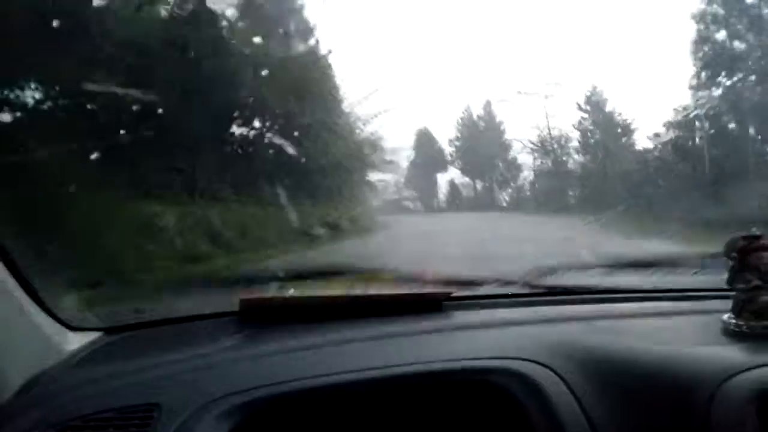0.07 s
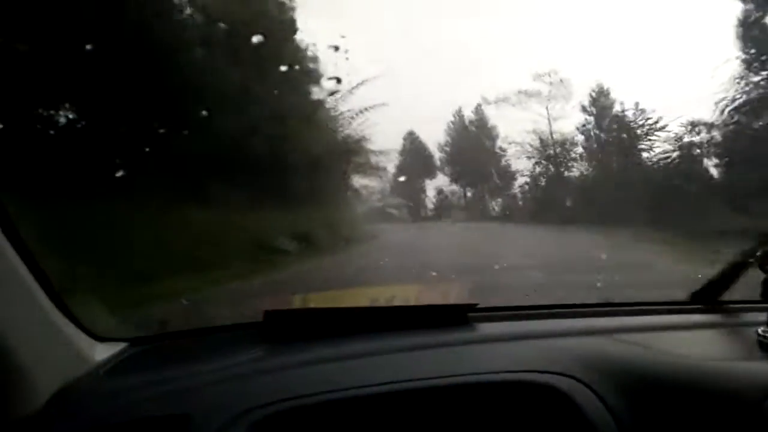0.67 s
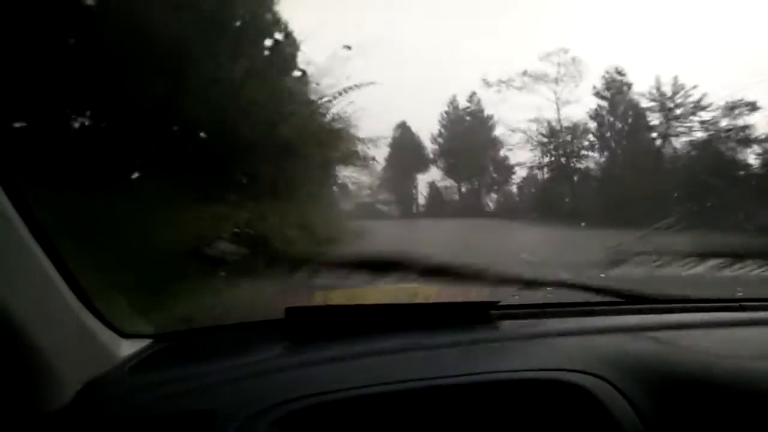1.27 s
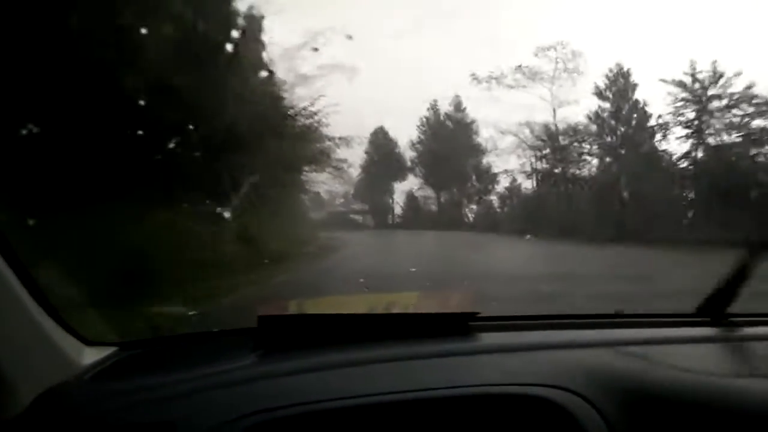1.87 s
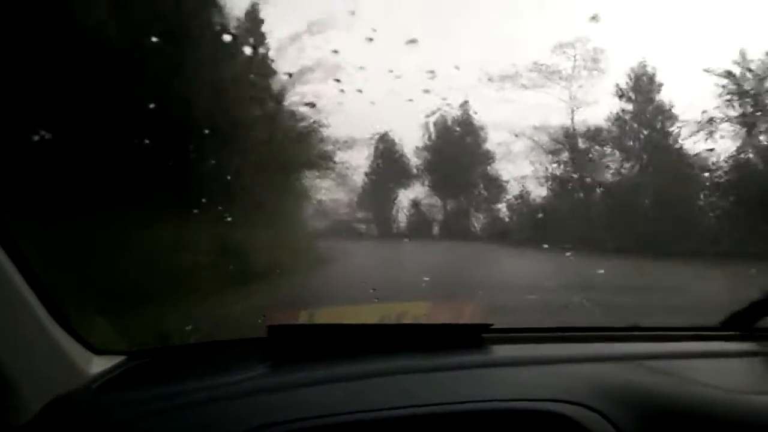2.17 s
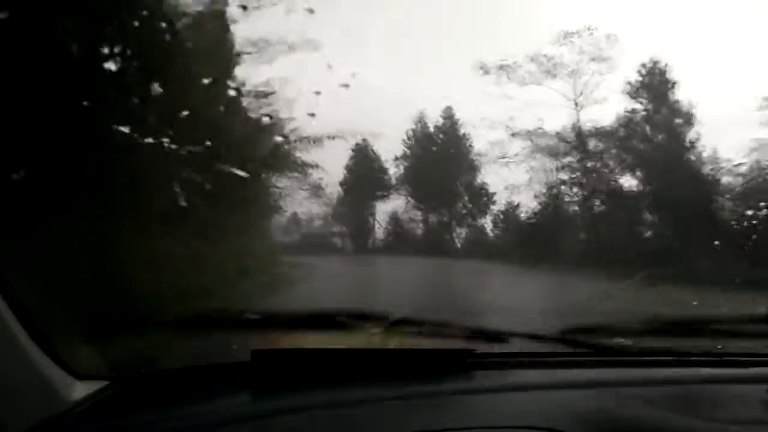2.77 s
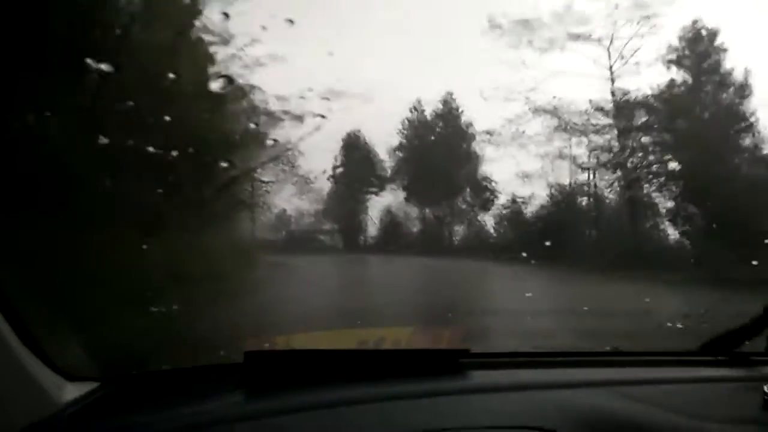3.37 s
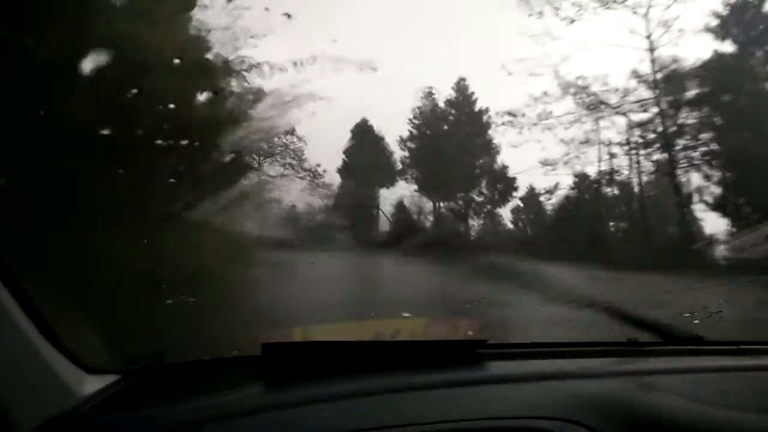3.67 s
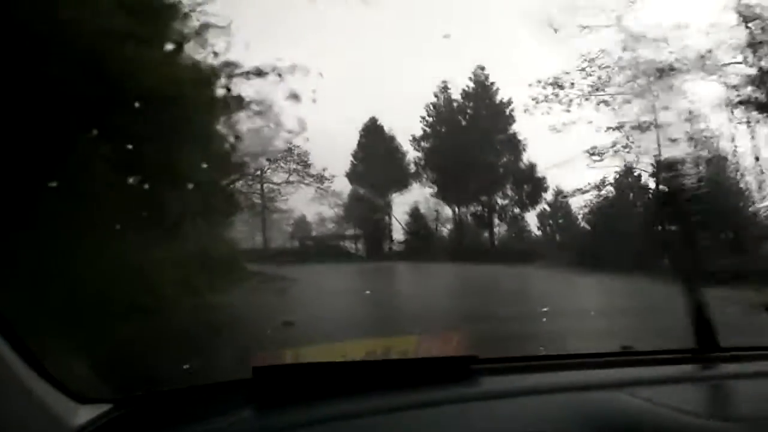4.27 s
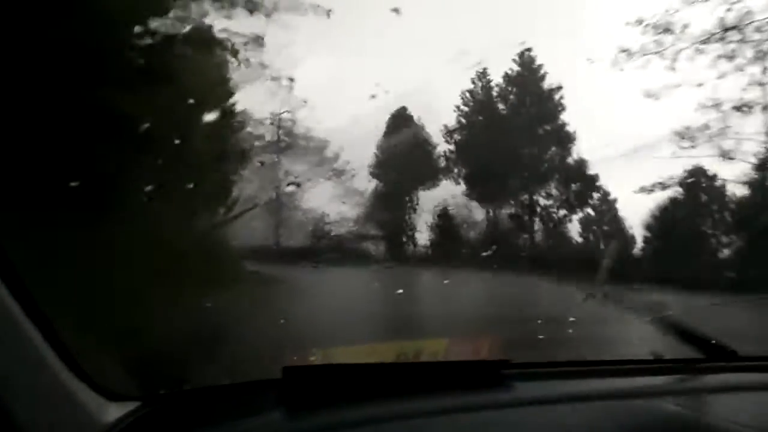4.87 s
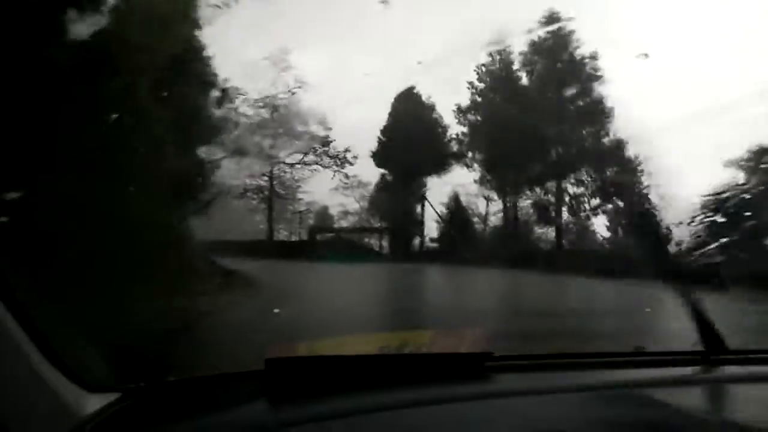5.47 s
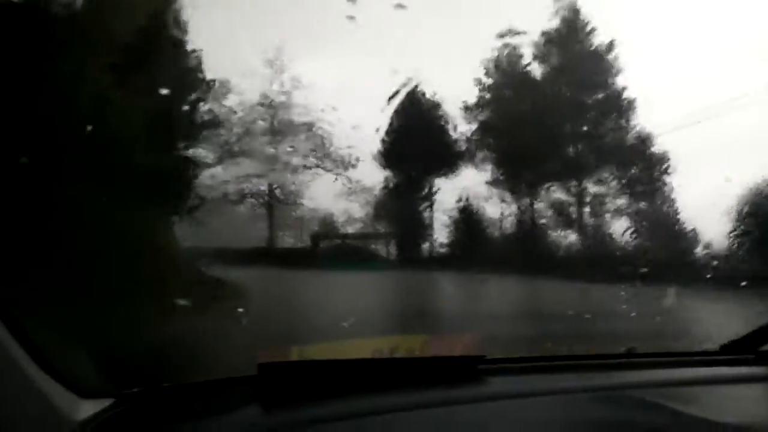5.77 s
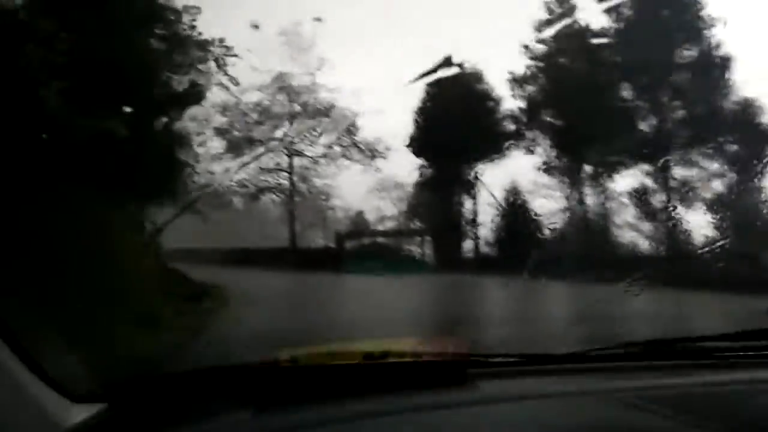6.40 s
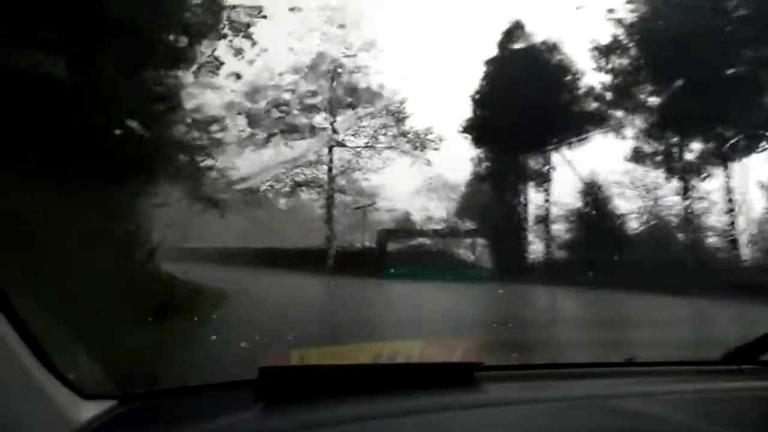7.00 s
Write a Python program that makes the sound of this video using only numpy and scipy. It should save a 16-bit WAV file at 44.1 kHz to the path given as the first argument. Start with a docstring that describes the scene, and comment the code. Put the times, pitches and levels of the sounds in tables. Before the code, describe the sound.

Sharp, uneven taps of big raindrops hit a car's windshield, close to a microphone in the cabin, while duller splashes and occasional small pings come from the metal body. Fine rain blurs into a steady wash behind them. The car rolls slowly, with a deep road rumble, a soft engine hum and occasional muffled bumps. One faint, rising wiper whine comes early, and the downpour surges and dips before thinning slightly.

```python
"""Heavy rain from inside a slow car

Heard from the front seat, fat drops crack on the windshield and patter, duller and longer, on the
roof and bonnet; a few set a patch of panel ringing. Fine rain blurs into a wash between them, and
a rubber wiper blade whines once on the wet glass. Underneath, the tyres shake the body into a
rumble, bumps make the cabin air boom and the engine hums quietly."""
import sys
import numpy as np
from scipy import signal
from scipy.io import wavfile
from scipy.ndimage import uniform_filter1d

SR = 44100
rng = np.random.default_rng(int(sys.argv[2]) if len(sys.argv) > 2 else 0)


def bounce(signal):
    """Save signal as a 16-bit WAV file at the path given by the first command-line argument."""
    frames = np.transpose(np.atleast_2d(signal))
    limited = np.clip(frames, -1, 1)
    pcm = np.round(limited * 32767).astype(np.int16)
    wavfile.write(sys.argv[1], SR, pcm)


N = 314874
TIME = np.arange(N) / SR


def gain_of(db):
    """Decibels to amplitude."""
    return 10 ** (np.asarray(db) / 20)


def unit_rms(x):
    """Scales a signal to an rms of 1."""
    return x / np.sqrt(np.mean(x ** 2) + 1e-20)


def add(mix, start_s, sound):
    """Lays a sound into the stereo mix at start_s."""
    part = mix[:, round(start_s * SR):][:, :sound.shape[1]]
    part += sound[:, :part.shape[1]]


def stereo_noise(size, alike=0):
    """White noise whose two sides have the share `alike` of their power in common."""
    noise = rng.standard_normal((3, size))
    return np.sqrt(alike) * noise[0] + np.sqrt(1 - alike) * noise[1:]


def colour(x, curve, size=8192):
    """Minimum-phase EQ of unit energy: shapes the tone and keeps attacks sharp."""
    hz, db = np.transpose(curve)
    bin_hz = abs(np.fft.fftfreq(size, 1 / SR)) + 1
    log_gain = np.log(gain_of(np.interp(np.log(bin_hz), np.log(hz), db)))
    taps = np.fft.ifft(np.exp(np.conj(signal.hilbert(log_gain)))).real[:size // 2]
    return signal.oaconvolve(x, taps[None] / np.linalg.norm(taps), axes=1)[:, :N]


def resonate(x, hz, width_hz):
    """One resonance with a peak gain of 1."""
    return signal.lfilter(*signal.iirpeak(min(hz, SR / 2 - 1), hz / width_hz, SR), x)


def road(boom_db=-7.0, boom_hz=157, boom_width_hz=40):
    """The tyres shake the body; bumps make the cabin air boom at its own resonance."""
    # road noise in the cabin, falling as the car slows: time_s, level_db
    road_levels = [(0.62, -18.5), (2.5, -16.5), (3.0, -20), (4.7, -21.5), (5.6, -20.5), (7.14, -20.5)]
    # bumps in the road: centre_s, half_length_s, rumble_lift_db, boom_lift_db
    bumps = [(1.382, 0.17, 2.5, -1.5), (2.18, 0.11, -2.5, 4.5), (3.35, 0.043, 4.5, -2),
             (4.345, .09, 1.5, 9), (5.206, 0.15, 1.5, -0.5), (6.842, 0.046, 7.5, 7)]
    # tone of the shaking body: frequency_hz, gain_db
    rumble_eq = [(28, -33.5), (42, 2.5), (62, 3), (105, -0.5), (160, -10.5), (240, -17), (900, -75)]
    lift_db = sum(np.outer(db, np.exp(-((TIME - s) / half_s) ** 2)) for s, half_s, *db in bumps)
    rumble_gain, boom_gain = gain_of(np.interp(TIME, *np.transpose(road_levels)) + lift_db)
    rumble = unit_rms(colour(stereo_noise(N, alike=0.99), rumble_eq))
    air = resonate(stereo_noise(N, alike=0.97), boom_hz, boom_width_hz)
    boom = unit_rms(resonate(air, boom_hz, boom_width_hz))
    return rumble_gain * rumble + gain_of(boom_db) * boom_gain * boom


def engine(hum_db=-29, firing_hz=61, wander=0.06, octave_db=-9):
    """A quiet hum at the drifting firing rate and its octave."""
    drift = unit_rms(uniform_filter1d(uniform_filter1d(rng.standard_normal(N), SR // 2), SR // 8))
    phase = 2 * np.pi * np.cumsum(firing_hz * (1 + wander * drift)) / SR
    return gain_of(hum_db) * (np.sin(phase) + gain_of(octave_db) * np.sin(2 * phase))


def rainfall(time_s):
    """How hard it rains at time_s, in dB."""
    # surges and lulls of the downpour: time_s, level_db
    surges = [(0.62, 4), (1.3, 1.5), (2.05, 3), (2.2, 0.5), (2.4, -4.5), (2.85, 0.5), (3.1, -4.5),
              (3.7, -0.5), (4.5, 1.5), (5.45, 1), (5.9, -3.5), (6.5, -7.5), (7.14, -8.5)]
    return np.interp(time_s, *np.transpose(surges))


def fine_rain(level_db=-27.0, drops_per_s=300, spread_db=5.0, t60_s=0.076, wash=0.58, follow=0.29):
    """Countless small drops, a few larger, ring the whole body and blur into a wash."""
    # tone of the body under fine rain: frequency_hz, gain_db
    patter_eq = [(150, -3), (380, 14), (560, 6), (750, 9), (1200, -0.5), (2400, -2.5), (4500, -6.5),
                 (6900, -0.5), (10400, -18.5), (16000, -24)]
    sizes = gain_of(spread_db * np.minimum(rng.exponential(1, N), 3))
    hits = sizes * (rng.random(N) < drops_per_s / SR)
    ring_power = signal.lfilter([1], [1, -gain_of(-120 / (t60_s * SR))], hits ** 2)
    patter = unit_rms(np.sqrt(ring_power) * stereo_noise(N)) + wash * stereo_noise(N)
    return gain_of(level_db + follow * rainfall(TIME)) * unit_rms(colour(patter, patter_eq))


def shower(level_db, span_db, count):
    """Lesser drops scattered all along, louder in harder rain: rows of start_s, level_db."""
    jitter, share = rng.random((count, 2)).T
    start_s = (np.arange(count) + jitter) / count * N / SR
    return list(zip(start_s, level_db + rainfall(start_s) + span_db * share))


def strike(envelope, low_hz, high_hz, pan_db, spatter_db, width_share=0.16):
    """A panel's dense modes ring, shaken by droplets; the spot hit favours two pitches and one side."""
    size = len(envelope)
    spatter = unit_rms(uniform_filter1d(rng.standard_normal(size), size=24))
    modes = stereo_noise(size) * gain_of(spatter_db * np.clip(spatter, -2, 2))
    spot_hz = low_hz * (high_hz / low_hz) ** rng.random(2)
    favoured = sum(resonate(modes, hz, width_share * hz) for hz in spot_hz)
    pan = gain_of(pan_db * rng.standard_normal() * np.array([[1], [-1]]))
    return unit_rms(modes + favoured) * envelope * pan


def windshield(ring_db=-6.0, pan_db=-0.23, splash_t60_s=0.059, snap=0.36, snap_s=0.0017,
               crack_db=-8, crack_t60_s=0.0067, crack_hz=5500):
    """Each drop cracks and dies fast in the laminated glass; the wetter the pane, the longer the splash."""
    # fat drops on the windshield: start_s, level_db
    drops = [(0.678, -12), (0.689, 2.5), (0.762, -4), (0.912, -6), (0.928, -3), (0.961, -2.5),
             (0.993, -7.5), (1.05, -10.5), (1.066, -10), (1.095, 0), (1.22, -5.5), (1.238, -1.5),
             (1.283, -5.5), (1.409, 0.5), (1.4915, -3.5), (1.553, -6), (1.6, -3), (1.634, 3), (1.742, -4.5),
             (1.774, -4), (1.938, -2.5), (1.967, -2), (2.057, -4.5), (2.07, 1.5), (2.37, 2.5), (2.407, 1),
             (2.451, -2), (2.491, -7.5), (2.559, -3), (2.575, -4.5), (2.612, -2.5), (2.628, -1.5),
             (2.657, -1), (2.687, -5), (2.723, -3), (2.763, -2), (2.809, -3), (2.827, -1.5), (2.849, 2),
             (2.876, -5.5), (2.954, -4), (3.015, -5.5), (3.044, 1.5), (3.204, -0.5), (3.228, 0.5),
             (3.264, -3.5), (3.297, -10), (3.359, -8), (3.391, -8), (3.458, -2), (3.494, -4), (3.571, -0.5),
             (3.653, -7), (3.754, 1.5), (3.8565, -3.5), (3.918, -3.5), (3.982, -4), (4.017, -13),
             (4.078, -6.5), (4.164, -6.5), (4.22, -8.5), (4.262, -4), (4.332, -8), (4.403, -3),
             (4.45, -6.5), (4.512, 2), (4.57, -0.5), (4.657, -3.5), (4.69, -4), (4.719, 1), (4.815, -5),
             (4.873, 3.5), (4.891, -6), (4.924, 0), (5.02, -2.5), (5.044, -7), (5.072, -6), (5.099, -3),
             (5.167, -3), (5.22, -6), (5.26, -5.5), (5.295, 0.5), (5.316, 1.5), (5.371, -3), (5.43, 1),
             (5.447, -4.5), (5.521, -1.5), (5.562, -2), (5.592, -2), (5.654, -6.5), (5.687, -6),
             (5.705, 2.5), (5.777, -8.5), (5.796, -7), (5.822, -4), (5.863, -14), (5.945, -3),
             (5.961, -3.5), (6.072, -0.5), (6.183, -9), (6.257, -9.5), (6.373, -6), (6.443, -3.5),
             (6.506, -1), (6.622, -3), (6.655, -1), (6.719, -2), (6.746, -4.5), (6.843, -6), (6.915, -7),
             (6.961, -3.5), (7.068, 0.5), (7.13, -5)]
    # tone of the glass: frequency_hz, gain_db
    glass_eq = [(200, -7.5), (1200, -9), (2000, -2.5), (2900, -2.5), (5000, -1), (7000, 4.5), (8500, -3),
                (11000, -12.5), (16000, -18.5)]
    ring, crack = np.zeros((2, 2, N))
    t = np.arange(SR // 12) / SR
    for start_s, db in drops + shower(level_db=-14, span_db=6, count=56):
        t60_s = splash_t60_s * np.exp(0.03 * rainfall(start_s))  # 3% longer per dB of rain
        envelope = gain_of(db - 60 * t / t60_s) * (1 + snap * np.exp(-t / snap_s))
        add(ring, start_s, strike(envelope, low_hz=2200, high_hz=8520, pan_db=0.48, spatter_db=1.0))
        add(crack, start_s, gain_of(db + crack_db - 60 * t / crack_t60_s) * stereo_noise(len(t)))
    # the first instant of the impact is far brighter than the ringing
    crack = signal.lfilter(*signal.butter(1, [crack_hz, 2 * crack_hz], "band", fs=SR), crack)
    return colour(ring, glass_eq) * gain_of(ring_db + pan_db * np.array([[1], [-1]])) + crack


def roof(level_db=-2.0, rise_s=0.0027, t60_s=0.14):
    """Struck sheet metal behind the lining swells for a few milliseconds and rings on."""
    # big splashes on the roof and bonnet: start_s, level_db
    drops = [(0.873, -9), (0.955, -13), (1.049, -16), (1.205, -9.5), (1.266, -11), (1.439, -13),
             (1.499, -12), (1.942, -7), (2.006, -10.5), (2.259, -19), (2.312, -15), (2.336, -12),
             (2.411, -11), (2.844, -10), (2.979, -10.5), (3.16, -17.5), (3.264, -9.5), (3.55, -13),
             (3.887, -13), (4.005, -10.5), (4.121, -14.5), (4.285, -12.5), (4.331, -10.5), (4.378, -12),
             (4.449, -9.5), (4.58, -12), (4.879, -14), (4.994, -11), (5.965, -13.5), (6.124, -11),
             (6.202, -13), (6.313, -16.5), (6.498, -12.5), (6.925, -13)]
    # tone of the lined metal: frequency_hz, gain_db
    metal_eq = [(100, 5), (230, 2), (390, 8), (560, 2), (720, 5), (1300, -4), (2400, -2), (4500, -8),
                (6800, 0), (10500, -17.5), (16000, -24)]
    out, t = np.zeros((2, N)), np.arange(SR // 7) / SR
    envelope = (1 - np.exp(-t / rise_s)) ** 2 * gain_of(-60 * t / t60_s)
    envelope /= envelope.max()
    for start_s, db in drops + shower(level_db=-17.5, span_db=-2.5, count=64):
        splash = strike(envelope, low_hz=886, high_hz=4300, pan_db=0.3, spatter_db=1.5)
        add(out, start_s, gain_of(db) * splash)
    return gain_of(level_db) * colour(out, metal_eq)


def wiper(wobble=0.008):
    """Rubber sticks and slips evenly for a moment: a faint rising whine on its 2nd and 3rd partials."""
    # the blade rubbing the wet glass: time_s, pitch_hz, level_db
    rub = [(1.5, 197.7, -26), (1.58, 204, -38), (1.698, 224.6, -29.5), (1.78, 238, -39)]
    time_s, pitch_hz, level_db = np.transpose(rub)
    t = np.arange(time_s[0], time_s[-1], 1 / SR)
    waver = unit_rms(uniform_filter1d(rng.standard_normal(len(t)), size=400))
    slip_hz = np.interp(t, time_s, pitch_hz) * (1 + wobble * waver)
    phase = 2 * np.pi * np.cumsum(slip_hz) / SR
    envelope = gain_of(np.interp(t, time_s, level_db)) * signal.windows.tukey(len(t), 0.2)
    whine = envelope * (np.sin(2 * phase) + np.sin(3 * phase))
    out = np.zeros((2, N))
    add(out, time_s[0], whine[None])
    return out


def pings(t60_cycles=70, width_share=0.29):
    """A cluster of close modes dies in a set number of cycles: high plinks are short, low knocks long."""
    # drops that set a small patch of panel ringing: start_s, level_db, pitch_hz
    drops = [(2.569, -24.5, 394), (3.031, -21.5, 297), (3.295, -10.5, 2250), (3.762, -4, 2640),
             (4.126, -21, 1380), (4.426, -7.5, 2160), (4.594, -19, 935), (5.042, -12, 1620),
             (6.135, -17.5, 490), (6.219, -13.5, 1630), (6.559, -13, 1900)]
    out, t = np.zeros((2, N)), np.arange(SR // 4) / SR
    for start_s, db, hz in drops:
        modes = resonate(stereo_noise(len(t), alike=0.49), hz, width_share * hz)
        modes = resonate(modes, hz, 3 * width_share * hz)  # trims the skirts
        envelope = gain_of(db - 60 * hz * t / t60_cycles)
        add(out, start_s, unit_rms(modes * envelope) * np.sqrt(np.mean(envelope ** 2)))
    return out


def mic_ports(x, left_hz=4200, right_hz=9500, width_hz=2800, left_lift=0.66, right_lift=0.12):
    """Each microphone port has a mild resonance of its own."""
    left, right = x
    return np.array([left + left_lift * resonate(left, left_hz, width_hz),
                     right + right_lift * resonate(right, right_hz, width_hz)])


def scene(mono_below_hz=850):
    """Rain over the car's own sounds; long waves reach both sides alike, so the rain's bass narrows."""
    left, right = windshield() + roof() + fine_rain()
    side = signal.lfilter(*signal.butter(1, mono_below_hz, "high", fs=SR), (left - right) / 2)
    rain = (left + right) / 2 + side * np.array([[1], [-1]])
    return rain + pings() + wiper() + road() + engine()


def record(dry, open_s=0.62, ceiling=0.63, cutoff_hz=16000):
    """Silent until open_s, the microphone rounds off the hardest cracks and cuts the top treble."""
    opened = mic_ports(dry) * (TIME >= open_s)
    rounded = opened / (1 + (opened / ceiling) ** 4) ** (1 / 4)
    lowpass = signal.firwin(255, cutoff_hz, window=("kaiser", 8), fs=SR)
    return signal.oaconvolve(rounded, lowpass[None], "same")


dry = scene()
out = record(dry)
bounce(out)
```